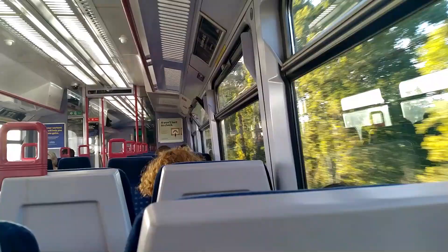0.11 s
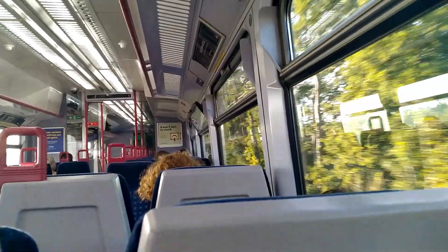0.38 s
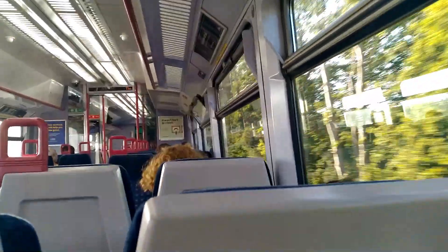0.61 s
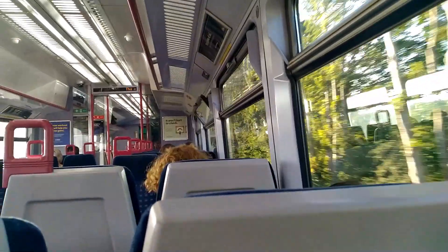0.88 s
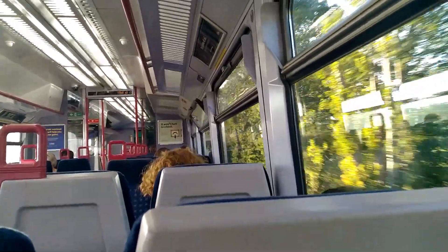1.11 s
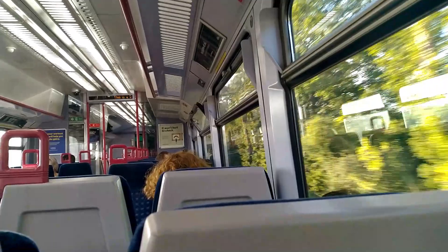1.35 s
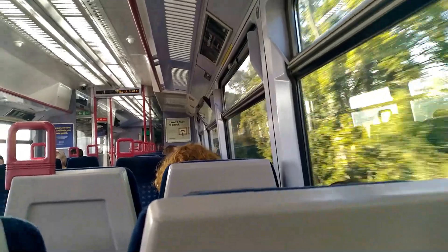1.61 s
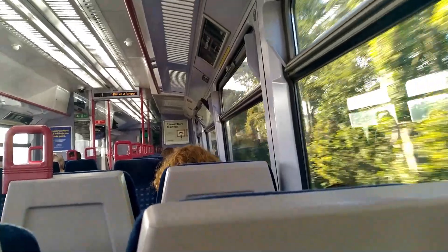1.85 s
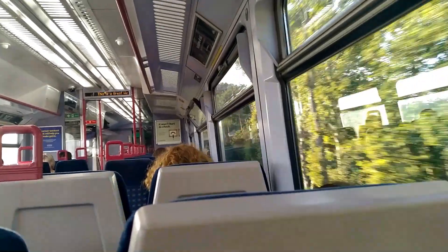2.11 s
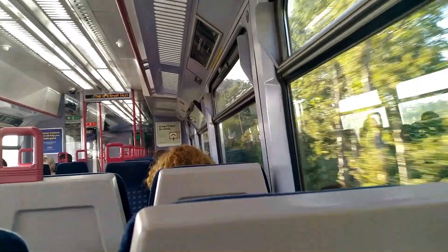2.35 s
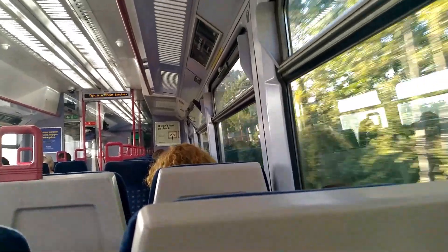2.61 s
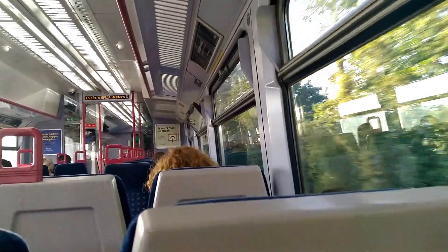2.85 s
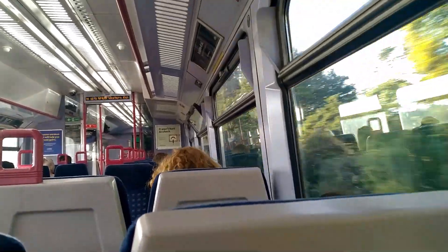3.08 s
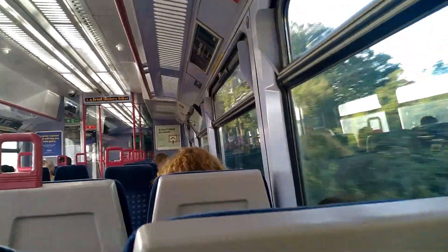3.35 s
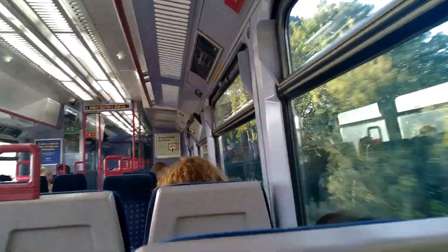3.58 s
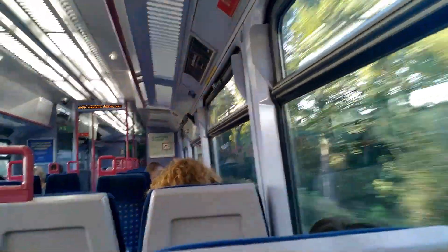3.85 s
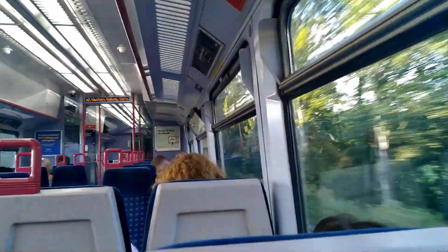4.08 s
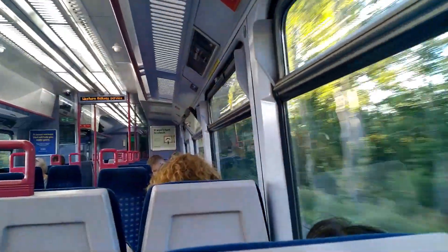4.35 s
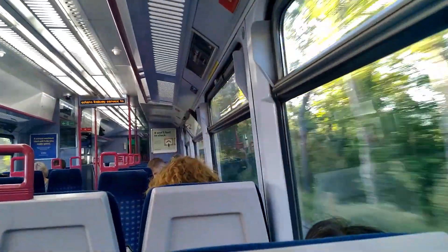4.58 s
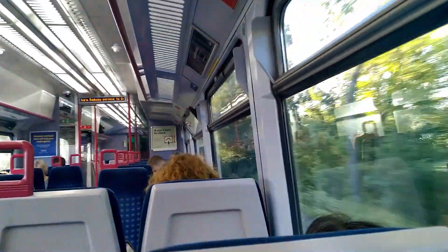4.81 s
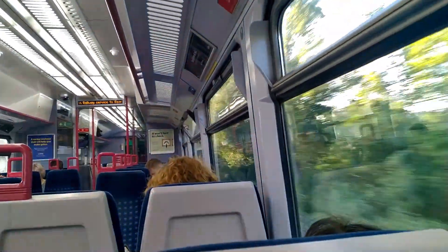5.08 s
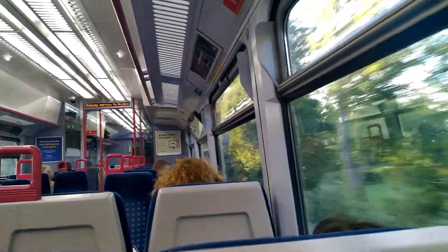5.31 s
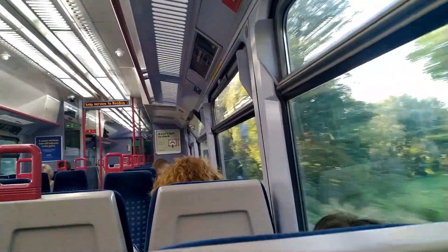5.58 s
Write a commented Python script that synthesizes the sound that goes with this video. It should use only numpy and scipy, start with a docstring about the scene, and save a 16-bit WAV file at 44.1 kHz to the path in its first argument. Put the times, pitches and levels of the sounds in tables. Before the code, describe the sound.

Steady rumbling train ride heard from a seat, with deep uneven thudding, engine drone, faint gear whine, soft air hiss and brief knocks and rustles.

```python
"""The body of a diesel railcar at speed heaves on its springs, thuds and rumbles: bands of noise, lowest below hearing.
Wheels roar and air hisses past as patchy noise; the underfloor engine hums on its shaft orders as wavering sines.
The final drive whines upward as speed grows, on multiples of its tooth rate. A low drone stops at one sharp click
early on; dull knocks ring the modes of a panel, short rustles are grainy noise.
A small two-port microphone hears it all, overloaded by the heave."""
import sys
import numpy as np
from scipy import signal
from scipy.fft import rfft, irfft, next_fast_len
from scipy.io import wavfile
from scipy.ndimage import uniform_filter1d, map_coordinates

SR = 44100
rng = np.random.default_rng(int(sys.argv[2]) if len(sys.argv) > 2 else 0)


def boost_factor(decibels):
    """Convert a level in decibels to a linear amplitude factor."""
    exponent = np.asarray(decibels, float) / 20
    return 10 ** exponent


def output_pcm(signal):
    """Save a mono or channel-first signal as 16-bit PCM at the path in sys.argv[1].

    Samples are clipped to [-1, 1] before scaling.
    """
    pcm = np.clip(np.atleast_2d(signal).T, -1, 1) * 32767
    wavfile.write(sys.argv[1], SR, np.round(pcm).astype(np.int16))


N = 251061


def unit(x):
    """Scaled to rms 1."""
    return x / np.sqrt(np.mean(x ** 2) + 1e-20)


def along(points, hz):
    """(Hz, value) points read on a log frequency axis."""
    f, v = np.transpose(points)
    return np.interp(np.log(hz + 1), np.log(f + 1), v)


def curves(rows):
    """One value per sample for each column after the time."""
    s, *cols = np.transpose(rows)
    return [np.interp(np.arange(N) / SR, s, c) for c in cols]


def wobble(knots_per_s):
    """A smooth random curve, for rates up to 60 knots per second."""
    knots = rng.standard_normal(int(N * 60 / SR) + 4)
    return map_coordinates(knots, [np.arange(N) * knots_per_s / SR])


def filtered(x, response):
    """x times a response of frequency."""
    m = next_fast_len(N + SR // 2)
    hz = np.fft.rfftfreq(m, 1 / SR)
    return irfft(rfft(x, m) * response(hz), m)[..., :N]


# Stereo width. Each row: frequency in Hz, side over mid in dB.
STEREO_WIDTH = [(30, -31), (60, -28), (100, -23.5), (180, -17), (300, -9.5), (510, -8), (880, -2.5),
                (1400, .5), (2500, -.7), (5000, 0)]


def rush(spectrum, patchy_db):
    """Stereo noise of rms 1: shaped by spectrum, random gain in time-frequency patches, wider toward the treble."""
    z = signal.stft(rng.standard_normal((2, N)), nperseg=512)[2]
    field = rng.standard_normal(z.shape[1:])
    field = uniform_filter1d(field, size=6, axis=0)
    field = uniform_filter1d(field, size=12, axis=1)
    pair = signal.istft(z * boost_factor(patchy_db * unit(field)), nperseg=512)[1][:, :N]

    def mid_side_gain(hz):
        angle = np.arctan(boost_factor(np.minimum(along(STEREO_WIDTH, hz), 1)))
        return boost_factor(along(spectrum, hz)) * [np.cos(angle), np.sin(angle)]

    mid, side = filtered(pair, mid_side_gain)
    return unit(np.array([mid + side, mid - side]))


def tone(hz, db, waver_db, drift_rad):
    """A sine that wavers in level and drifts in phase, the drift a little different at each port."""
    phase = 2 * np.pi * np.cumsum(hz * np.ones(N)) / SR
    phase = phase + drift_rad * wobble(5) + rng.uniform(0, 2 * np.pi)
    apart = np.arctan(boost_factor(along(STEREO_WIDTH, np.mean(hz)))) * np.tanh(wobble(1.5))
    level = boost_factor(db + waver_db * wobble(6))
    return np.sqrt(2) * level * np.sin([phase + apart, phase - apart])


def even(swing):
    """A swing of rms 1 with its slow chance swells ironed out."""
    power = uniform_filter1d(swing[0] ** 2, size=12000)
    return unit(swing / np.sqrt(power + .15))


# Spectra of the body's motion. Each row: frequency in Hz, relative level in dB per Hz.
SWAY_SPECTRUM = [(3, -40), (6, -3), (8.5, 0), (10.5, -5), (13, -30), (25, -120)]
BOUNCE_SPECTRUM = [(4, -120), (9, -30), (11.5, -2), (14, 0), (17, -8), (21, -5), (24, -12), (29, -35),
                   (60, -120)]
THUD_SPECTRUM = [(10, -120), (20, -30), (25, 0), (33, 0), (45, -5), (55, -15), (70, -40), (130, -120)]
RUMBLE_SPECTRUM = [(32, -28), (55, -4), (72, -1.5), (85, -4), (119, -7.5), (145, -10), (163, -9.5),
                   (178, -13), (215, -12.5), (245, -13.5), (272, -30), (360, -61), (620, -120)]
# The body on its springs. Each row: time in seconds, sway in dB, bounce in dB.
SPRING_LEVELS = [(0, -10.5, -17), (.8, -11.5, -12.5), (1.4, -16.5, -20.5), (2.4, -12.5, -8),
                 (2.9, -14, -22), (3.3, -10.5, -21), (3.65, -10, -11), (4, -6, -14.5), (4.65, -14.5, -15.5),
                 (5.3, -14, -19), (5.69, -6.5, -20.5)]
# Heave of the low end with the track. Each row: time in seconds, floor rumble in dB, deep thudding in dB.
HEAVE_LEVELS = [(0, -20.5, -22), (.5, -24.5, -21.5), (1, -23.5, -20.5), (1.5, -22.5, -13), (2, -23, -19),
                (2.5, -23.5, -19.5), (3, -23.5, -20.5), (3.4, -22, -23), (3.7, -20, -21.5),
                (3.85, -25.5, -22), (4.4, -22, -22), (4.8, -23.5, -18.5), (5.3, -22, -20.5),
                (5.69, -21, -22.5)]


def body():
    """Track irregularities sway and bounce the body on its springs, thud in the frame and rumble in the floor."""
    sway_db, bounce_db = curves(SPRING_LEVELS)
    rumble_db, thud_db = curves(HEAVE_LEVELS)
    sway = boost_factor(sway_db) * even(rush(SWAY_SPECTRUM, patchy_db=0))
    bounce = boost_factor(bounce_db) * even(rush(BOUNCE_SPECTRUM, patchy_db=0))
    thud = boost_factor(thud_db) * rush(THUD_SPECTRUM, patchy_db=0)
    rumble = boost_factor(rumble_db) * rush(RUMBLE_SPECTRUM, patchy_db=.5)
    return sway + bounce + thud + rumble


# Spectra of wheel roar and air hiss. Each row: frequency in Hz, relative level in dB per Hz.
ROAR_SPECTRUM = [(160, -34.5), (270, -5), (300, -1), (343, -4), (375, -4), (420, -6.5), (455, -1),
                 (490, -2.5), (535, -9), (590, -5), (666, -6), (706, -6.5), (1220, -8.5), (1400, -13),
                 (1760, -8.5), (2060, -10), (2800, -20), (3640, -44.5), (6160, -120)]
HISS_SPECTRUM = [(1650, -31.5), (2800, -3), (3250, -1), (3520, 0), (4170, -2), (5930, -1.5), (7270, 3),
                 (7900, 1.5), (10300, -35.5), (17400, -120)]
# Swells and dips of both. Each row: time in seconds, level about the mean in dB.
RIDE_SWELL = [(0, -1.5), (.3, -0.7), (1.4, 0.3), (2.3, 0.26), (2.5, -1), (3, 0.2), (3.3, -0.6), (3.68, 0.3),
              (3.84, -2), (4.6, 0), (5.69, -0.15)]
ROAR_DB, HISS_DB = -30, -39  # mean, rms


def ride():
    """Wheels roar through the floor and air hisses past: two noise bands that swell and shake together."""
    swell_db, = curves(RIDE_SWELL)
    shake_db = 0.14 * wobble(16)  # jolts reach floor, walls and windows together
    roar_db = ROAR_DB + swell_db + shake_db
    hiss_db = HISS_DB + swell_db + shake_db + 0.26 * wobble(35)
    return boost_factor(roar_db) * rush(ROAR_SPECTRUM, patchy_db=0.73) + boost_factor(hiss_db) * rush(HISS_SPECTRUM, patchy_db=.5)


SHAFT_HZ = 24.404
# Engine lines. Each entry: multiple of the shaft rate.
SHAFT_ORDERS = [2, 3, 4, 5, 10, 12, 14, 20, 28, 32, 36, 44, 46, 50, 52]
# Levels of those lines before waver. Each entry: level in dB rms.
SHAFT_ORDER_DB = [-33, -29.5, -36, -37, -47, -48, -48, -54, -58, -54, -53, -57, -59, -57, -59]
# Hums between the orders. Each row: frequency in Hz, level in dB rms before waver.
LOW_HUMS = [(135, -38), (187, -40), (562, -51)]


def engine():
    """Orders of a shaft at steady speed, and a few hums between them."""
    orders = [(k * SHAFT_HZ, db) for k, db in zip(SHAFT_ORDERS, SHAFT_ORDER_DB)]
    return sum(tone(hz, db, waver_db=2, drift_rad=.3) for hz, db in orders + LOW_HUMS)


TOOTH_HZ, SPEEDUP_HZ_PER_S = 216.7, 1.2  # tooth rate at the start, its rise


def tooth_rate_hz():
    """Tooth rate of the final drive, tied to wheel speed."""
    return TOOTH_HZ + SPEEDUP_HZ_PER_S * np.arange(N) / SR


HUM_RATIO, HUM_DB = 1.808, -50  # pitch over the tooth rate, rms level between swells
# Swells of the wheel hum. Each row: crest in seconds, time from crest to 1/e in seconds, rise in dB.
WHEEL_HUM_SWELLS = [(2.88, .16, 12), (5.2, .3, 9)]


def wheel_hum():
    """A faint hum tied to wheel speed that comes and goes."""
    t = np.arange(N) / SR
    swell_db = sum(db * np.exp(-((t - s) / half_s) ** 2) for s, half_s, db in WHEEL_HUM_SWELLS)
    return tone(HUM_RATIO * tooth_rate_hz(), HUM_DB + swell_db, waver_db=1, drift_rad=.2)


# Low drone. One row: end in seconds, level in dB rms, centre in Hz, half width to 1/e in Hz.
LOW_DRONE = (.187, -20.5, 165, 85)


def drone():
    """A band of low noise, cut off abruptly."""
    end_s, db, centre_hz, width_hz = LOW_DRONE
    band = filtered(rng.standard_normal(N), lambda hz: np.exp(-((hz - centre_hz) / width_hz) ** 2))
    return boost_factor(db) * unit(band) * (np.arange(N) / SR < end_s)


# Click. One row: time in seconds, step height in dB, recovery time constant in seconds.
CLICK_STEP = (.18688, -5.5, .03)


def click():
    """The signal climbs, drops in one sudden step, then recovers exponentially."""
    s, step_db, recovery_s = CLICK_STEP
    t = np.arange(N) / SR - s
    climb = np.exp(-np.abs(t) / 0.0037)
    recovery = -np.exp(-np.abs(t) / recovery_s)
    return boost_factor(step_db) / 2 * np.where(t < 0, climb, recovery)


# Gear whine. Each row: multiple of the tooth rate, level at time zero in dB rms, change in dB per second.
GEAR_LINES = [(.5, -36, 0), (1, -41.5, 0), (2, -48, .7), (3, -40.3, -.85)]


def whine():
    """Gear teeth mesh at a rate that rises with wheel speed, heard from the click on."""
    t = np.arange(N) / SR
    tooth_hz = tooth_rate_hz()
    gears = sum(tone(k * tooth_hz, db + db_per_s * t, waver_db=.5, drift_rad=.05)
                for k, db, db_per_s in GEAR_LINES)
    return gears * (t > CLICK_STEP[0])


# Blows on a panel. Each row: start in seconds, level in dB, pitch that the spot favours in Hz.
PANEL_BLOWS = [(.187, -24, 1000), (.191, -19.5, 640), (.345, -22.5, 580), (.358, -26, 690),
               (1.913, -29, 800), (1.98, -24, 1050), (2.003, -20, 1000), (2.009, -24, 2100),
               (2.27, -22, 1450), (2.275, -25, 2400), (2.28, -26, 1700), (2.296, -29, 2900),
               (2.302, -30, 1400)]
# Panel modes. Each row: frequency in Hz, relative level in dB, 60 dB decay time in seconds.
PANEL_MODES = [(530, 0, .07), (600, -1, .07), (700, -1, .07), (890, -1, .06), (1060, 0, .065),
               (1310, -1, .05), (1530, -1, .06), (2050, -1, .07), (2300, -3, .06), (2650, -3, .07),
               (2970, -1, .07)]
KNOCK_RISE_S = .006
SPOT_OCTAVES = .35  # distance from the favoured pitch at which a mode is 6 dB weaker


def knocks():
    """Blows ring the modes of a panel; each spot favours the modes near one pitch."""
    t = np.arange(N) / SR
    out = np.zeros(N)
    for s, db, spot_hz in PANEL_BLOWS:
        u = np.maximum(t - s, 0)
        ring = np.zeros(N)
        for hz, mode_db, t60_s in PANEL_MODES:
            spot_db = -6 * (np.log2(hz / spot_hz) / SPOT_OCTAVES) ** 2
            level_db = mode_db + spot_db + rng.normal(0, 2) - 60 * u / t60_s
            ring += boost_factor(level_db) * np.sin(2 * np.pi * hz * u)
        out += boost_factor(db) * ring * (1 - np.exp(-u / KNOCK_RISE_S))
    return out


def burst(s, rise_s, fall_s, pan_db):
    """A panned envelope: a rounded rise to the crest, then an exponential fall."""
    t = np.arange(N) / SR - s
    envelope = np.where(t < 0, np.exp(-(t / rise_s) ** 2), np.exp(-np.abs(t) / fall_s))
    return envelope * boost_factor([[pan_db / 2], [-pan_db / 2]])


# Scuffs. Each row: crest in seconds, fall in seconds, low part in dB, high part in dB, left over right in dB.
SCUFFS = [(1.858, .027, -38, -34, 4.5), (1.916, .014, -42, -38, -16), (1.968, .018, -35, -33, -11),
          (1.987, .018, -33, -27, 2), (1.998, .016, -34, -26.5, 0), (2.015, .017, -27.5, -23, -5.5),
          (2.035, .03, -33, -31, -5), (2.276, .024, -27, -46, 0), (2.287, .035, -37, -34, 0),
          (3.346, .01, -45, -40, -13), (4.236, .011, -56, -33, -5), (5.074, .07, -41, -33, -7.5)]
# Spectra of the two parts. Each row: frequency in Hz, relative level in dB per Hz.
SCUFF_LOW_SPECTRUM = [(150, -90), (350, -25), (650, -2), (1150, 0), (1700, -5), (2200, -4), (3200, -8),
                      (4500, -25), (9000, -90)]
SCUFF_HIGH_SPECTRUM = [(1000, -90), (2500, -18), (4000, -3), (5500, 0), (6800, -1), (7900, -2)]
RISE_SHARE = .4  # rise time over fall time


def rustles():
    """Short scuffs of grainy noise, each with its own share of low and high."""
    grain = boost_factor(2.8 * map_coordinates(rng.standard_normal(N // 50), [np.arange(N) / 70]))
    low = rush(SCUFF_LOW_SPECTRUM, patchy_db=1.5)
    high = rush(SCUFF_HIGH_SPECTRUM, patchy_db=1.5)
    out = np.zeros((2, N))
    for s, fall_s, low_db, high_db, pan_db in SCUFFS:
        out += burst(s, RISE_SHARE * fall_s, fall_s, pan_db) * (boost_factor(low_db) * low + boost_factor(high_db) * high)
    return unit(grain) * out


def scene():
    """All sources but the click, as they reach the two ports."""
    return body() + ride() + engine() + wheel_hum() + drone() + whine() + knocks() + rustles()


def low_pass(x):
    """Removes everything above the highest recorded frequency."""
    return signal.sosfilt(signal.butter(12, 15700, fs=SR, output="sos"), x)


# Balance of the ports. Each row: frequency in Hz, left over right in dB.
PORT_LEAN = [(30, 0), (100, 0), (180, 1.5), (300, 1.5), (510, -1), (880, 0), (1500, -.5), (4400, 0),
             (7500, 1.5)]
TOP_HZ = 7833  # upper band edge
FLOOR_DB = -79.5  # faint electronic hiss over the whole range, rms


def record(dry):
    """The ports lean slightly, the loudest heaves clip, the band ends steeply; click and hiss join after that."""
    x = filtered(dry, lambda hz: boost_factor(along(PORT_LEAN, hz) / 2 * np.array([[1], [-1]])))
    x = x / (1 + np.abs(x / 1.02) ** 12) ** (1 / 12)  # overload, rounded just below 1.02
    x = filtered(x, lambda hz: 1 / (1 + (hz / TOP_HZ) ** 90))
    hiss = boost_factor(FLOOR_DB) * rng.standard_normal(x.shape)
    mix = np.clip(x + click() + hiss, -1, 1)
    return low_pass(mix)


dry = scene()
out = record(dry)
output_pcm(out)
```